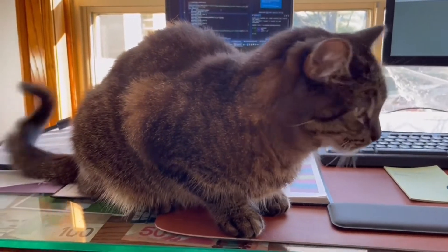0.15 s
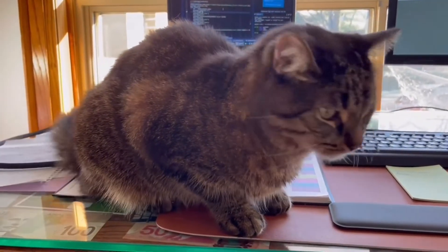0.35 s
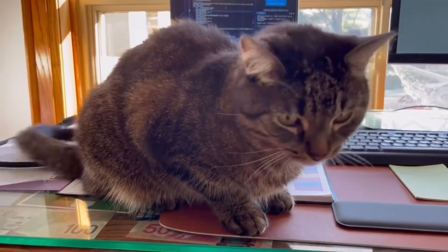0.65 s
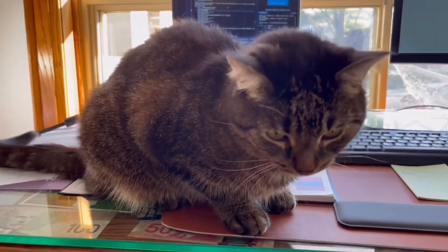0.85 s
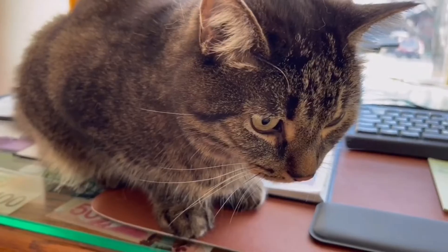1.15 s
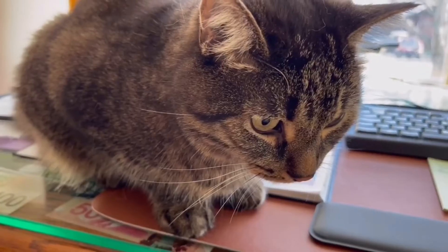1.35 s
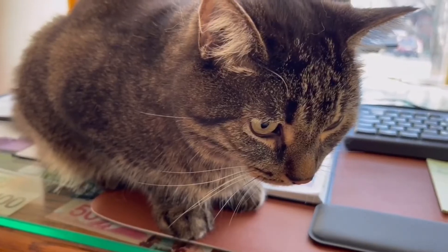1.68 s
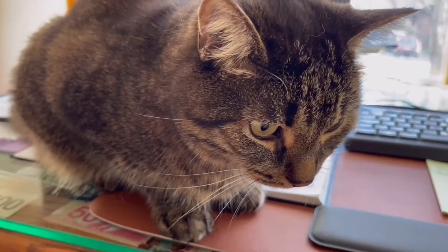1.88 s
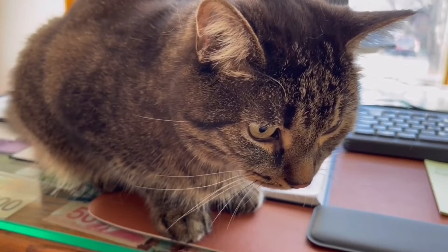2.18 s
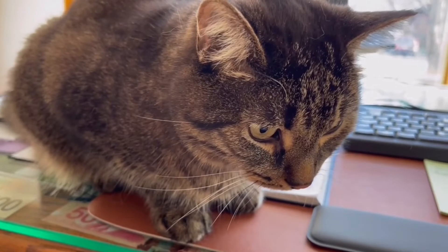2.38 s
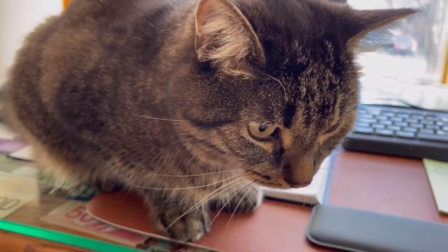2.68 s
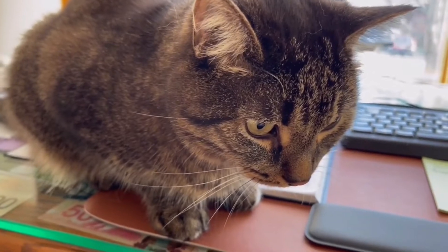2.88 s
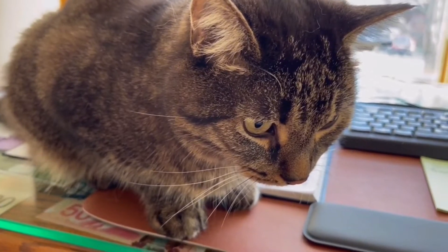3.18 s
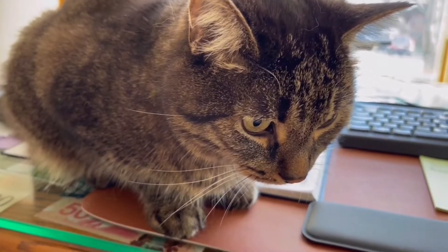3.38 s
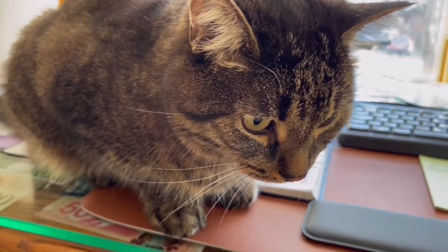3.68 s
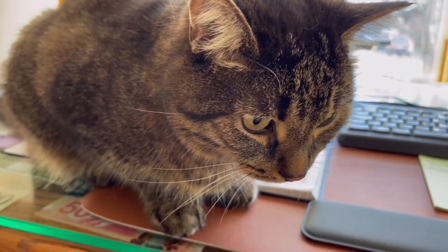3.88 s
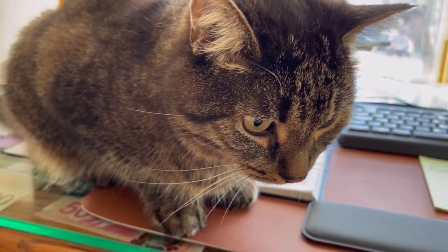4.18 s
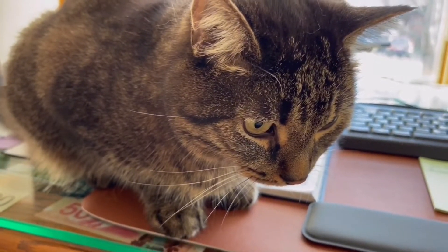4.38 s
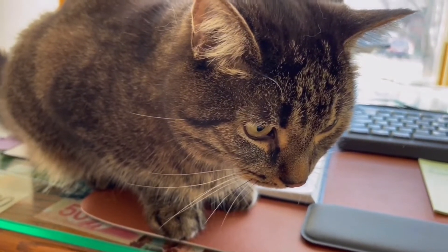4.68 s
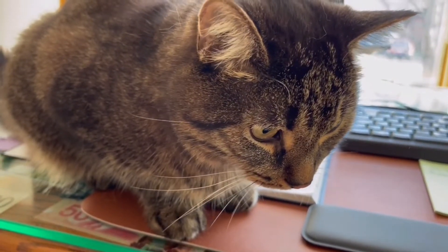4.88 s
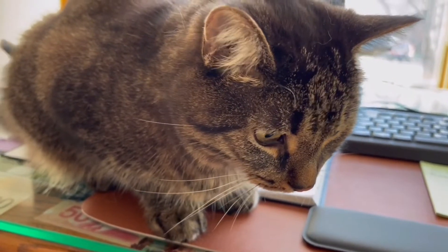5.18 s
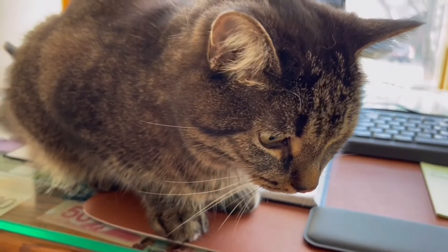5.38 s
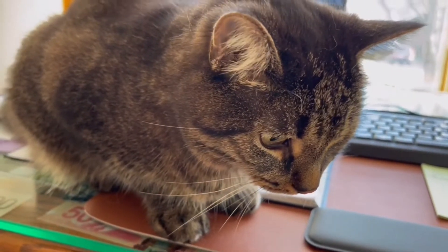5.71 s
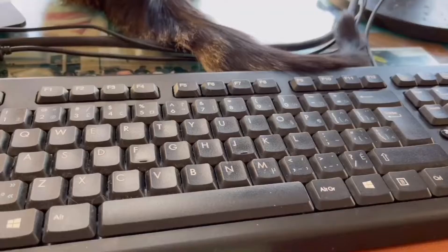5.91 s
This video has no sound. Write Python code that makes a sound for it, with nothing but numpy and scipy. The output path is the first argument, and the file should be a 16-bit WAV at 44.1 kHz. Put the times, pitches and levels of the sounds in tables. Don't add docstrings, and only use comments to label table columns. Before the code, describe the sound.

A cat purrs on a desk, very close to the microphone, in a quiet room with low rumble, faint hum, airy fan hiss and a barely audible high whine. From 0 to 0.85 s the purr is faint; a small tap and breath start, then silence from 0.89 to 0.96 s. A fluttering, whistling nasal out-breath runs to 1.4 s. A strong in-breath swells from 1.5 to 2.55 s, deep rapid thumps at about 25 a second. A long hissing out-breath fades until 3.6 s. Another strong throbbing in-breath follows, 3.7 to 4.75 s, with tiny ticks. The next out-breath starts softly and peaks near 5.4 s. At 5.7 s a dull knock with a rattle jolts the desk; at 5.82 s a much louder hollow, slightly metallic clatter rings briefly with room echo, cut to silence near 5.95 s, then nearly nothing.

```python
import sys
import numpy as np
from scipy import signal
from scipy.fft import rfft, irfft, next_fast_len
from scipy.io import wavfile
from scipy.ndimage import uniform_filter1d, map_coordinates

SR = 44100
rng = np.random.default_rng(int(sys.argv[2]) if len(sys.argv) > 2 else 0)


def invert_db(level):
    return 10 ** (np.asarray(level, dtype=float) / 20)


def waveform_to_disk(signal):
    frames = np.transpose(np.atleast_2d(signal))
    scaled = np.clip(frames, -1, 1) * 32767
    samples = np.round(scaled).astype(np.int16)
    wavfile.write(sys.argv[1], SR, samples)


N = 266805

# f/Hz, level/dB
BODY = [(30, -41), (45, -3), (120, 3.5), (230, -3.5), (400, -39.5), (600, -70)]
# f/Hz, level/dB
EDGE = [(120, -23), (230, 0), (370, 0), (440, -18.5), (600, -39.5), (900, -59)]
# f/Hz, level/dB
SNAP = [(500, -6.5), (900, -5), (1300, -6), (1750, -12), (2300, -35), (3000, -63)]
# t/s, length/s, dull thump level/dB
SHIFTS = [(0.477, 0.17, 7.5), (0.068, 0.52, -4), (1.7, 0.13, -1), (4.1, 0.26, 1.5), (4, 0.17, -2.5),
          (4, 0.14, 2), (3.1, 0.21, -5.5), (1.9, .15, 4), (2.2, .3, 0), (1.2, .1, -2)]
# start/s, end/s, f/Hz, level/dB
GRUNT = (1.535, 1.675, 150, -52)


def chest():
    drawn, edge, meeting, blown = breathing()
    sway = invert_db(.6 * wobble(5))
    thump = sway * invert_db(swells(SHIFTS)) * (drawn + blown)
    edge = sway * (edge + invert_db(-12.5) * blown)
    meeting = invert_db(1.2 * wobble(12)) * (meeting + invert_db(-23) * blown)

    reopening_s = .0246
    steady = pulses(.0005, .0005, 1.7) + .85 * pulses(reopening_s, .0007, 1.7)
    uneven = pulses(.0005, .0007, 2) + .75 * pulses(reopening_s, .001, 2.5)
    weakness_db = np.clip(-57 - 20 * np.log10(thump), 0, 9)
    shudder = .009 + .002 * weakness_db + .022 * blown / (drawn + blown)
    shaking = filtered(shudder * rng.standard_normal(N), through_desk(BODY, 0))
    dull = unit(filtered(steady, through_desk(BODY, 1.294)) + shaking)
    sharp = unit(filtered(uneven + .7 * shudder * rng.standard_normal(N), through_desk(EDGE, 1.3)))

    folds = .5 * puffs(0, .006, 2) + .15 * puffs(.02, .014, 4) + .06
    snap = unit(filtered(folds * rng.standard_normal(N) + 7 * pulses(0, .0006, 2), shaped(SNAP)))
    indrawn = (0.97 + puffs(-0.0027, 0.032, 2.2)) * rng.standard_normal(N)
    sniff = unit(filtered(indrawn, ringing([(2480, 110, 0)])))

    start, end, hz, db = GRUNT
    t = np.arange(N) / SR
    grunt = invert_db(db) * np.sin(np.pi * np.clip((t - start) / (end - start), 0, 1)) * np.sin(2 * np.pi * hz * t)
    return thump * dull + edge * sharp + meeting * snap + invert_db(-40.5) * thump * sniff + grunt


# start/s, end/s, chest level/dB, sharpness/dB, snap/dB
IN_BREATHS = [
    (-.2, 0.882, -66.5, -2.5, -26),
    (1.509, 2.56, -52.5, -6, -29.5),
    (3.68, 4.745, -53, -6, -29),
    (5.602, 6.6, -55.5, -5, -32),
]
SWELL_S, EBB_S, SWELL_DB, EBB_DB = 0.44, 0.2, 13, 13.5


def breathing():
    t = np.arange(N) / SR

    def inside(start, end):
        return np.clip(np.minimum(t - start, end - t) / .03, 0, 1)

    drawn = np.zeros((3, N))
    for start, end, db, sharp_db, snap_db in IN_BREATHS:
        swell_db = SWELL_DB * np.clip(1 - (t - start) / SWELL_S, 0, 1)
        ebb_db = EBB_DB * np.clip(1 - (end - t) / EBB_S, 0, 1)
        fade_db = 5 * np.clip(t - start - SWELL_S, -1, 1)
        parts_db = np.array([0 * t, sharp_db + 0 * t, snap_db - fade_db])
        drawn = drawn + inside(start, end) * invert_db(db - swell_db - ebb_db + parts_db)
    blown = sum(inside(rows[0][0], rows[-1][0]) * invert_db(curves(rows)[0] + 4.5) for rows in FLOW)
    at_the_turn = invert_db(-71.5)
    return *drawn, uniform_filter1d(blown, SR // 10) + at_the_turn


# first closure t/s, closure rate f/Hz
BEATS = [
    (.058, 25.39),
    (.8705, 25.81),
    (1.5145, 25.18),
    (2.6098, 25.9),
    (3.7172, 25.45),
    (4.834, 26.18),
]


def pulses(late_s, jitter_s, scatter_db):
    ends = [s for s, rate in BEATS[1:]] + [N / SR]
    beats = np.concatenate([np.arange(s, end - .5 / rate, 1 / rate) for (s, rate), end in zip(BEATS, ends)])
    chance = rng.standard_normal((len(beats), 2))
    at = beats + late_s + jitter_s * chance[:, 0]
    return np.bincount((at * SR).astype(int), invert_db(scatter_db * chance[:, 1]), N + SR)[:N]


def puffs(late_s, width_s, scatter_db):
    return signal.fftconvolve(pulses(late_s, .0007, scatter_db), np.hanning(int(width_s * SR)), "same")


# t/s, flow level/dB, nostril narrowing as whistle level/dB
FLOW = [
    [(.845, -61, -3), (.885, -70, 6.5), (1.0, -67, 0), (1.12, -69.5, 0), (1.236, -76.5, 9), (1.4, -73, 0)],
    [(2.59, -83.5, 6), (2.635, -65, -1.5), (2.86, -64, 2.5), (2.99, -69, 6), (3.1, -72, 3.5),
     (3.215, -68, -2), (3.45, -74.5, 0), (3.6, -85.5, 0.5)],
    [(4.8, -92, -3), (4.845, -71, -2), (4.96, -68.5, 4), (5.075, -72.5, -0.5), (5.2, -68, 0),
     (5.42, -65, -6), (5.54, -74, 4), (5.68, -74.5, -0.5)],
]
# fizz over the flow level/dB, first whistle f/Hz
NOSTRILS = [(-17.5, 4200), (-15.5, 4340), (-8.5, 4370)]
# f/Hz, width/Hz, level/dB
NOSTRIL = [(1020, 54, -3.5), (2120, 318, 3.5), (2594, 203, 10.5), (3210, 630, -5)]
# f/Hz, width/Hz, level/dB
SINUS = [(3700, 490, -1), (5200, 450, 1.5), (5940, 350, -0.5), (7160, 730, -3.5), (7960, 190, -1.5),
         (8860, 400, -8)]
# f/Hz, width/Hz, level/dB
TURNED = [(3070, 730, 0.5), (3890, 210, 2.5), (5030, 640, 1), (5920, 250, 0), (6230, 130, 0),
          (7400, 300, -4.5), (8050, 260, -6.5), (8550, 530, -13)]


def nose():
    stream, spurt = puffs(-.008, .021, 1.5), puffs(0, .006, 2)

    def jet(steady, slow, quick):
        return (steady + slow * stream + quick * spurt) * rng.standard_normal(N)

    low = unit(filtered(jet(.1, 0.49, 0.61), ringing(NOSTRIL)))
    air = jet(.11, .26, .75) + 9 * pulses(-.0005, .0006, 2)
    tunings = np.array([3800, 4000, 4200, 4400, 4600])
    pipes = [unit(filtered(air, lambda hz: ringing([(c, 330, 0)])(hz) ** 2)) for c in tunings]

    sound, t = np.zeros(N), np.arange(N) / SR
    for rows, (fizz_db, first_hz), sinus in zip(FLOW, NOSTRILS, [SINUS, SINUS, TURNED]):
        flow_db, whistle_db = curves(rows)
        start, end = rows[0][0], rows[-1][0]
        spent_s = np.clip(t - start, 0, 1)
        whistle_hz = first_hz - 403 * spent_s ** 2 + 30 * wobble(6.6)
        near = np.clip(1 - abs(np.clip(whistle_hz, 3800, 4600) - tunings[:, None]) / 200, 0, 1)
        whistle = invert_db(whistle_db) * (near * pipes).sum(0)

        spray = jet(.18, .25, 1) + 6 * pulses(-.0005, .0006, 3)
        fizz = unit(filtered(spray, lambda hz: ringing(sinus)(hz) ** 2))
        peak_db = swells([((start + end) / 2, end - start, 6)])
        fizz = invert_db(fizz_db + 2.0 + 0.47 * whistle_db + peak_db) * fizz

        breath = np.clip(np.minimum(t - start, (end - t - .012) / 3) / .01, 0, 1)
        sound += breath * invert_db(flow_db) * (low + whistle + fizz)
    return patchy(sound, depth_db=2.5)


# t/s, peak level/dB, f/Hz
TICKS = [(.065, -62, 1000), (1.593, -66.5, 1140), (1.672, -67, 1040), (1.753, -60, 1080),
         (1.793, -67, 1250), (1.376, -68, 3900), (1.06, -59, 1060), (1.834, -55.5, 1120),
         (3.796, -67, 1150), (4.072, -58.5, 1230), (4.125, -59, 1180), (4.187, -61, 1140),
         (4.308, -64, 1050), (4.543, -63, 1250), (4.463, -62, 1140), (0.84, -57.5, 2400),
         (0.8387, -50, 410), (2.209, -56.5, 627), (5.703, -54, 3360)]
# t/s, level/dB
BUMP = (5.7025, 16)
# f/Hz, level/dB
KNOCK = [(30, -24), (45, 1), (62, 3.5), (100, -4.5), (220, -29.5), (560, -24), (680, -40), (950, -25),
         (1400, -52), (2500, -69), (5000, -100)]


def desk():
    ticks, blow, t = np.zeros(N + SR), np.zeros(N), np.arange(SR // 4) / SR
    for s, db, hz in TICKS:
        envelope = invert_db(db - 60 * t / 0.012) * (1 - np.exp(-t / 0.00027))
        ticks[round(s * SR):][:len(t)] += envelope * np.sin(2 * np.pi * hz * t)
    bump_s, bump_db = BUMP
    blow[round(bump_s * SR)] = invert_db(bump_db)
    after = np.clip(np.arange(N) / SR - bump_s, -1e-6, 1)
    buzz = noise(ringing([(670, 260, 12), (2100, 920, -18), (3450, 570, -14.5)]))
    rattle = (after > 0) * invert_db(-62.0 - 60 * after / 0.12) * buzz
    return ticks[:N] + rattle + filtered(blow, through_desk(KNOCK, 1.76))


def through_desk(spectrum, cycles):
    def response(hz):
        return -invert_db(along(spectrum, hz)) * np.exp(-2j * np.pi * cycles * np.log(hz / 300 + 0.00082))
    return response


# t/s, level/dB
BLOWS = [
    (5.817, -72),
    (5.827, -51),
    (5.8293, -35),
    (5.842, -32),
    (5.856, -41),
    (5.873, -53),
    (5.891, -51.5),
]
# f/Hz, level/dB
CLATTER = [(40, -7), (80, -15.5), (180, -6), (350, -2), (600, -7), (1200, -6.5), (2200, -10.5), (3500, -22),
           (5500, -23.5), (8500, -26), (12000, -32)]
# f/Hz, T60/s
ROOM = [(100, 0.71), (400, 0.45), (1500, 0.38), (4000, 0.44), (10000, 0.25)]
# f/Hz, level/dB, T60/s
TINS = [(212, -14, 0.35), (237, -4.5, 0.36), (335, -7, .2), (480, -22, 0.4), (522, 5, 0.37),
        (813, 2.5, 0.51), (859, -7, 0.31), (1063, -12, 0.48), (1142, -3, 0.18), (1690, -1, 0.14),
        (2750, -4, 0.13)]


def clatter():
    sound, rings, u = np.zeros(N + SR), np.zeros(N + SR), np.arange(SR // 2) / SR
    for s, db in BLOWS:
        at = round(s * SR)
        hz, t, z = signal.stft(rng.standard_normal(SR // 2), SR, nperseg=256)
        tail = signal.istft(z * invert_db(-60 * t / along(ROOM, hz)[:, None]), SR, nperseg=256)[1]
        onset = np.clip(np.arange(len(tail)) / (0.0028 * SR), 0, 1)
        sound[at:][:len(tail)] += invert_db(db) * tail * onset
        for hz, level, t60 in TINS:
            decay = invert_db(level + rng.normal(0, 2.3) - 60 * u / t60)
            rings[at:][:len(u)] += invert_db(db - 7.5) * decay * np.sin(2 * np.pi * hz * u)
    boom = invert_db(-17.5 - 60 * u / .1) * (1 - np.exp(-u / 0.011)) * np.sin(2 * np.pi * 358 * u)
    rings[round(5.831 * SR):][:len(u)] += boom
    return filtered(sound[:N], lambda hz: invert_db(along(CLATTER, hz) + 20.0) * (hz < 12600)) + rings[:N]


# f/Hz, level/dB
RUMBLE = [(12, -18), (20, -5.5), (31, -8), (53, 0), (75, -12.5), (87, -15.5), (162, -20), (282, -28.5),
          (403, -22.5), (600, -39), (780, -69), (1320, -120)]
# f/Hz, level/dB
HISS = [(260, -42), (450, -5.5), (619, -4.5), (1060, -10.5), (1140, -8.5), (1610, -15.5), (9500, -20.5),
        (12400, -61), (20900, -120)]
ROOM_DB = [-63, -79.5]
# f/Hz, width/Hz, level/dB
HUM = [(43.36, 5, 0)]
HUM_DB = [-77, -63.5]
# t/s, rise/dB
SURGES = [(.47, 15), (1.26, 1), (1.47, -9), (1.85, 5), (2.4, 4.5), (4.08, 4), (4.98, 8.5), (5.62, 5)]
# f/Hz, level/dB
FAN = [(6500, -48), (8000, 7), (9300, 2.5), (11300, 4.5), (12300, -5.5), (13500, -21)]
# t/s, length/s, rise/dB
SWEEPS = [(.15, .2, 9), (.67, 0.36, 9), (.87, .06, 6), (5.09, .1, 9), (5.255, .06, 7), (5.69, .16, 7)]
# f/Hz, level/dB
WHINE = [(7897, -99), (8425, -104), (8683, -99), (9211, -105)]


def room():
    t = np.arange(N) / SR
    scene_change_s = GAPS[0][0]
    rumble = invert_db(ROOM_DB[0] - 5 + 1.5 * wobble(1.7)) * noise(shaped(RUMBLE))
    hiss = invert_db(ROOM_DB[1] - 2.0 + 0.54 * wobble(6.43)) * noise(shaped(HISS))
    hum_db = np.where(t < scene_change_s - .1, *HUM_DB) + swells([(s, 0.27, db) for s, db in SURGES])
    hum = invert_db(hum_db) * noise(lambda hz: ringing(HUM)(hz) ** 2)
    drawn, _, _, blown = breathing()
    stirred = 0.0045 * (drawn + blown)
    fan = (invert_db(-92 + swells(SWEEPS)) + stirred) * patchy(noise(shaped(FAN)), depth_db=2.0)
    whine = sum(invert_db(db + 4.0 + 1.5 * wobble(3.3)) * np.sin(2 * np.pi * hz * t) for hz, db in WHINE)
    return rumble + hum + hiss + fan + whine * (t > scene_change_s)


def swells(rows):
    t = np.arange(N) / SR
    return sum(db * np.cos(np.pi * np.clip((t - s) / length, -.5, .5)) ** 2 for s, length, db in rows)


def patchy(x, depth_db):
    z = signal.stft(x, nperseg=256)[2]
    field = uniform_filter1d(uniform_filter1d(rng.standard_normal(z.shape), 3, 0), 6, 1)
    return signal.istft(z * invert_db(depth_db * unit(field)), nperseg=256)[1][:N]


def wobble(rate):
    return map_coordinates(rng.standard_normal(int(N * rate / SR) + 4), [np.arange(N) * rate / SR])


def noise(response):
    return unit(filtered(rng.standard_normal(N), response))


def ringing(modes):
    def response(f):
        return sum((-1) ** k * invert_db(db) * 1j * f * w / (c * c - f * f + 1j * f * w)
                   for k, (c, w, db) in enumerate(modes))
    return response


def shaped(points):
    return lambda hz: invert_db(along(points, hz))


def filtered(x, response):
    m = next_fast_len(N + SR // 2)
    return irfft(rfft(x, m) * response(np.fft.rfftfreq(m, 1 / SR)), m)[..., :N]


def along(points, hz):
    f, v = np.transpose(points)
    return np.interp(np.log(hz + 1), np.log(f + 1), v)


def curves(rows):
    s, *cols = np.transpose(rows)
    return [np.interp(np.arange(N) / SR, s, c) for c in cols]


def unit(x):
    return x / np.sqrt(np.mean(x ** 2) + 1e-20)


def scene():
    before = np.clip((5.815 - np.arange(N) / SR) / 0.0013, 0, 1)
    return (before * (chest() + nose() + desk() + room()) + clatter())[None]


def band_limit(x):
    return signal.sosfilt(signal.butter(12, 12840, fs=SR, output="sos"), x)


# start/s, end/s
GAPS = [
    (.8915, .9565),
    (5.9455, 5.9725),
]


def record(dry):
    def microphone(hz):
        notch = 1 - 0.82 * np.exp(-((hz - 10200) / 520) ** 2)
        return notch * (0.1 + 0.82 / (1 + (37 / (hz + 1)) ** 12))

    mix = filtered(dry, microphone)
    for start, end in GAPS:
        mix[:, round(start * SR):round(end * SR)] = 0
    return band_limit(mix)


dry = scene()
out = record(dry)
waveform_to_disk(out)
```